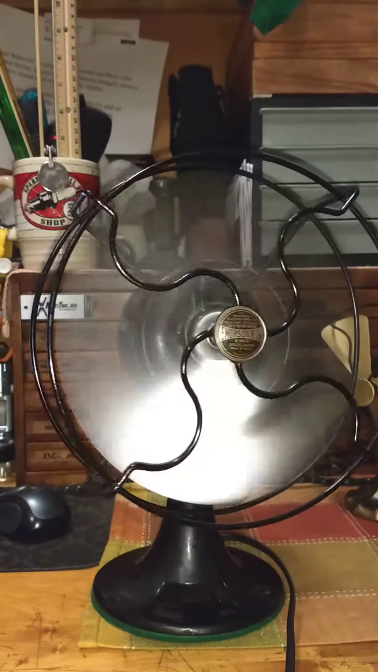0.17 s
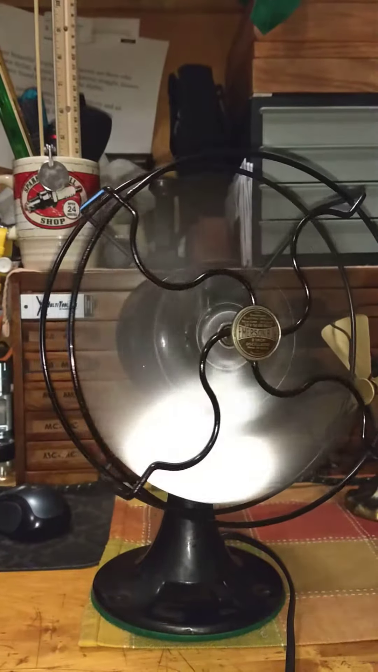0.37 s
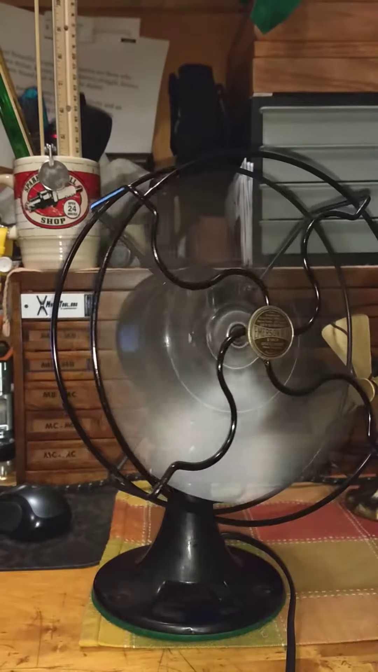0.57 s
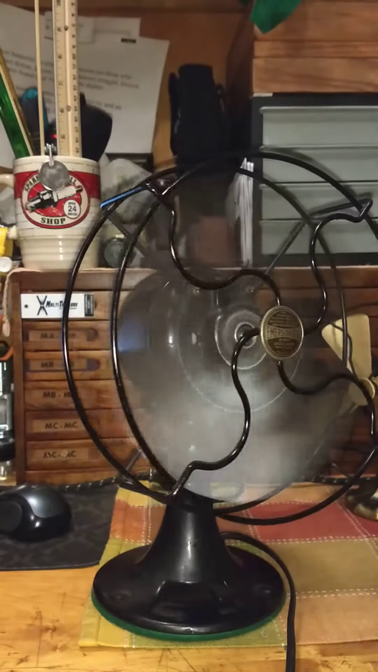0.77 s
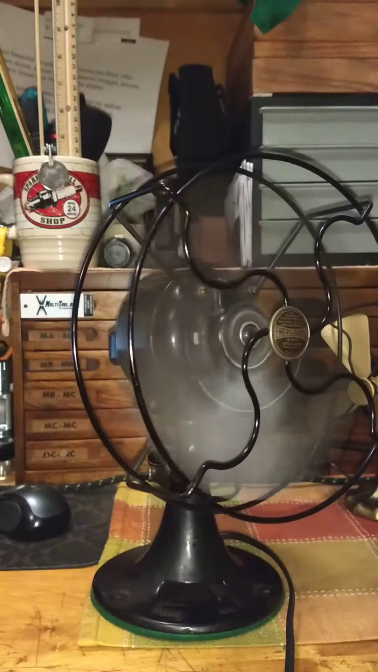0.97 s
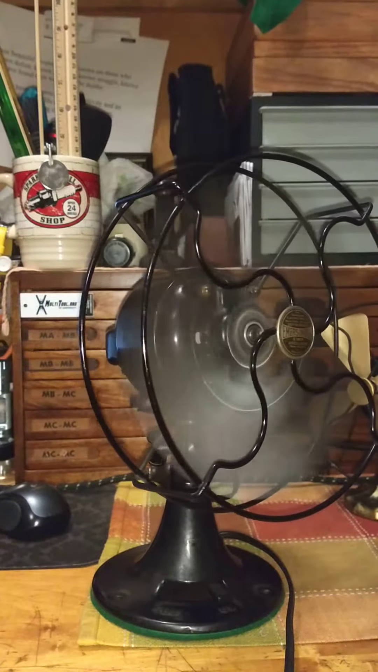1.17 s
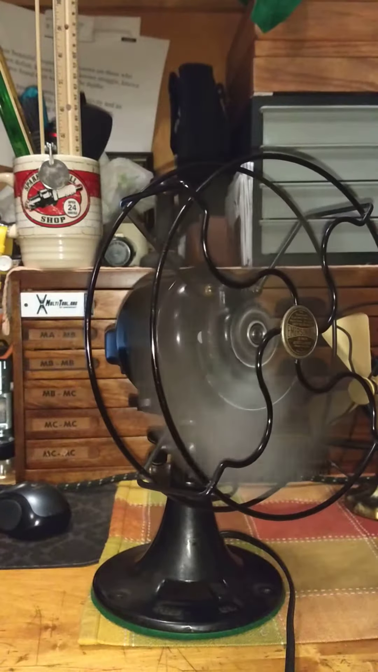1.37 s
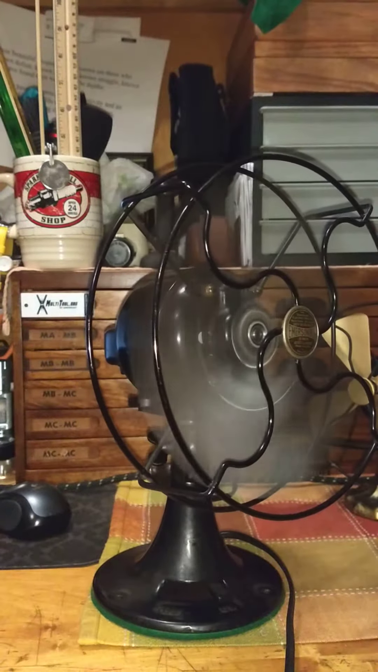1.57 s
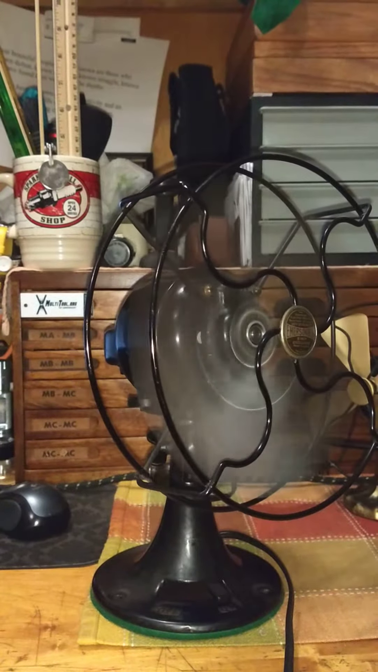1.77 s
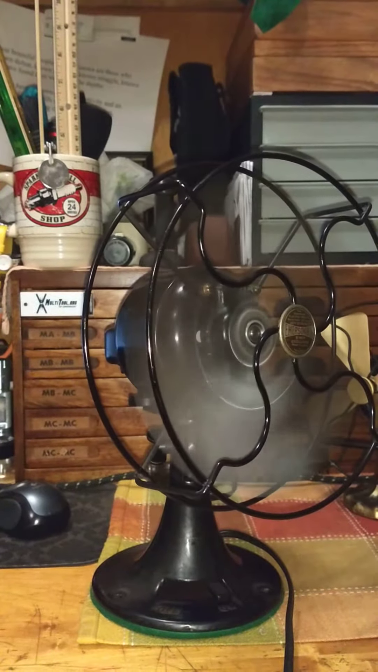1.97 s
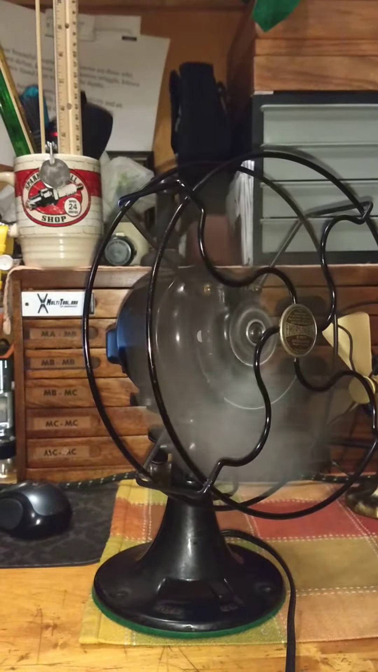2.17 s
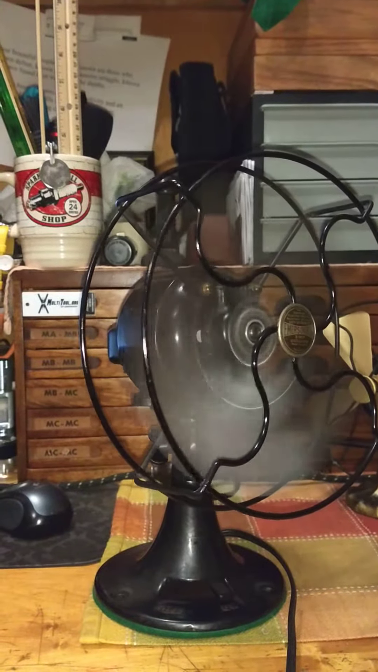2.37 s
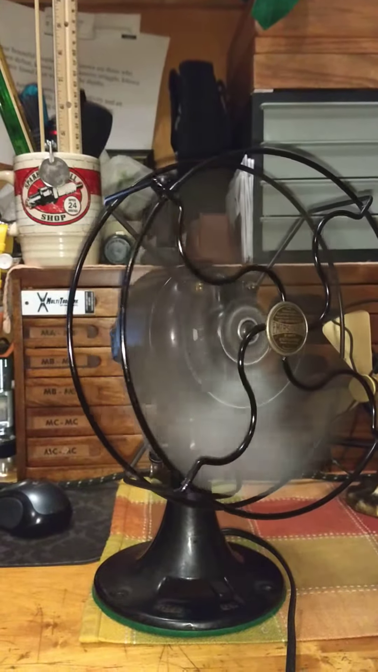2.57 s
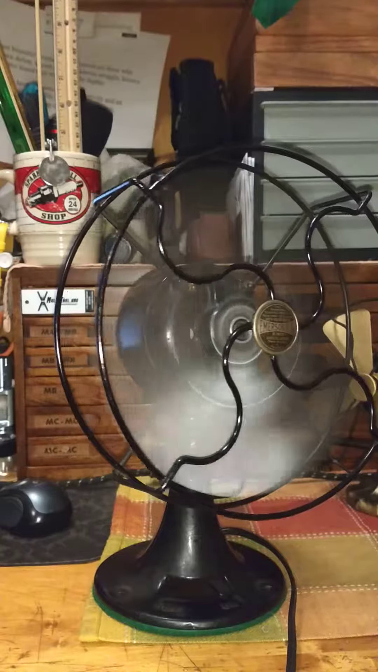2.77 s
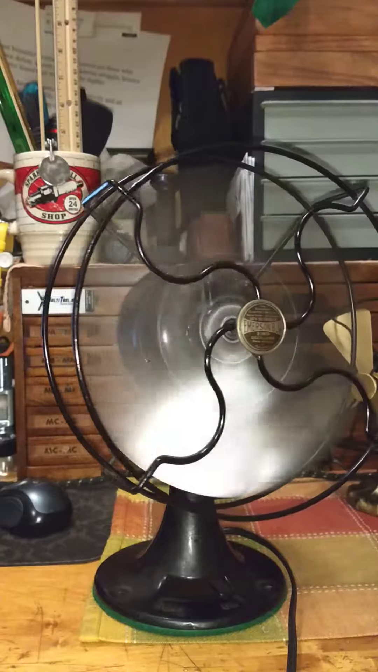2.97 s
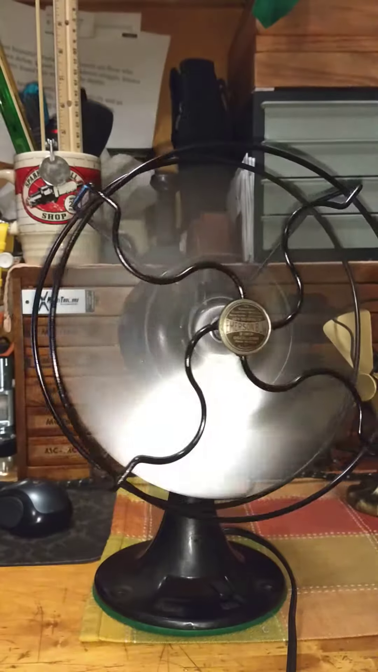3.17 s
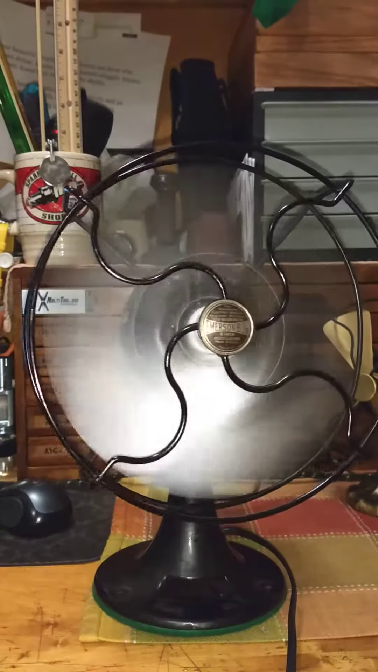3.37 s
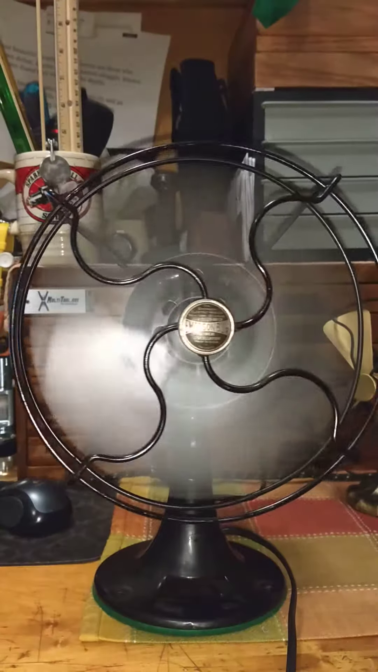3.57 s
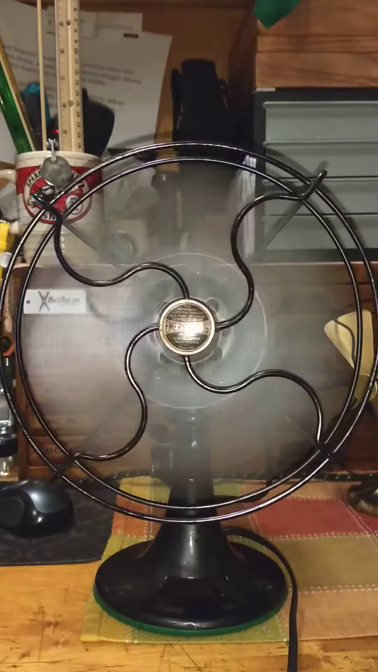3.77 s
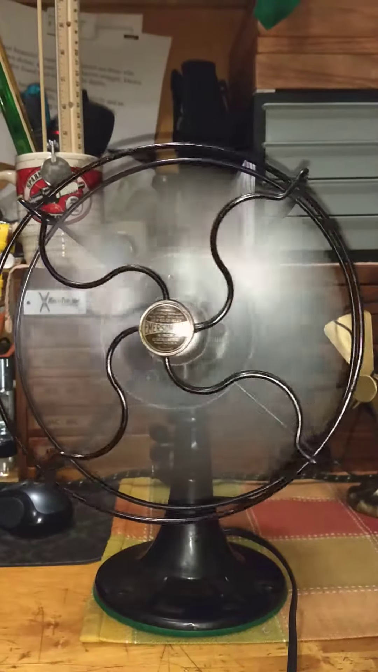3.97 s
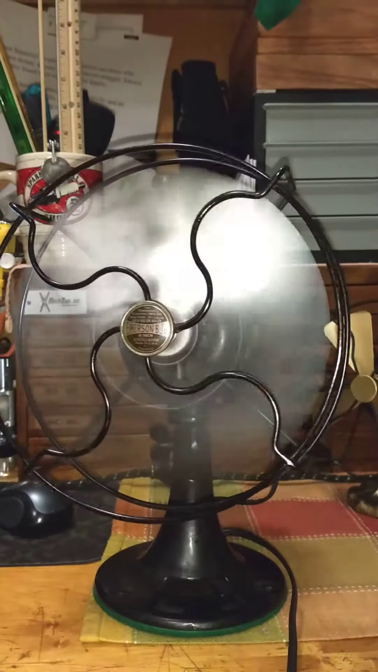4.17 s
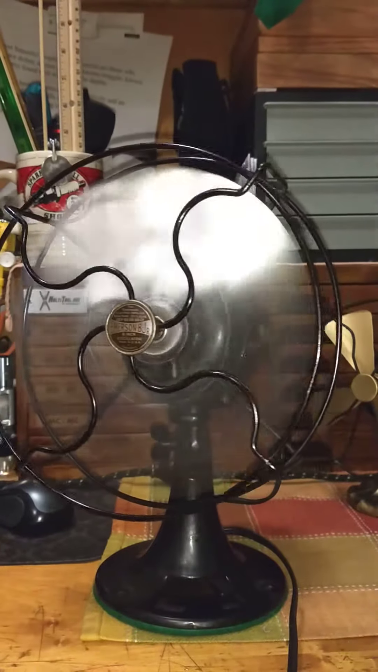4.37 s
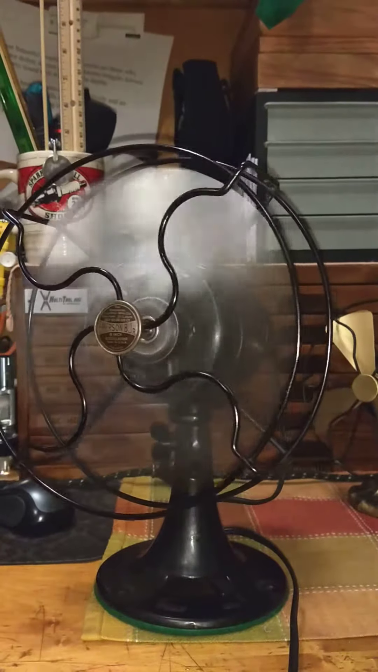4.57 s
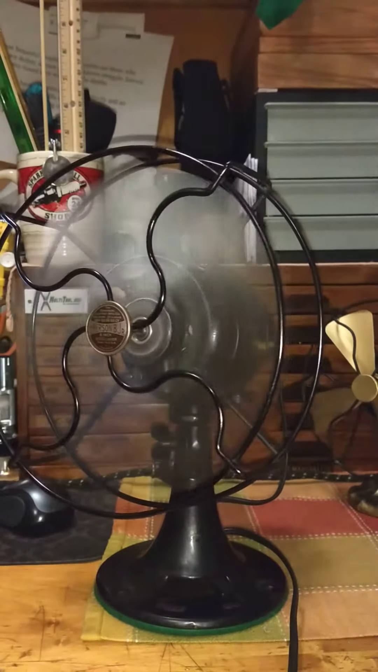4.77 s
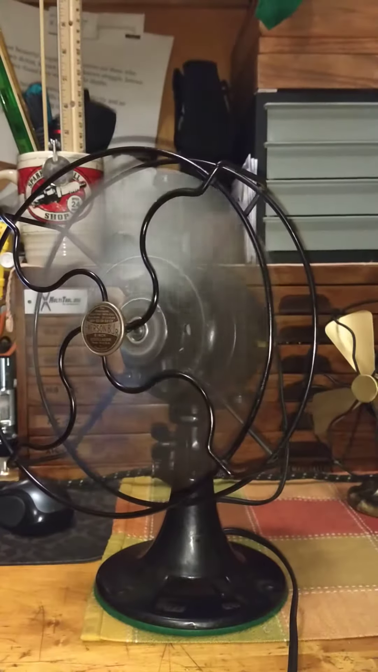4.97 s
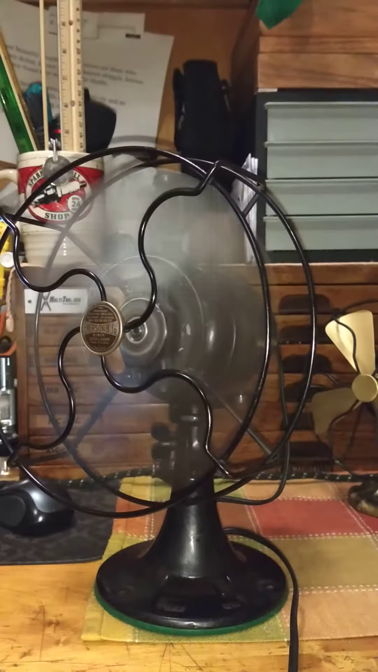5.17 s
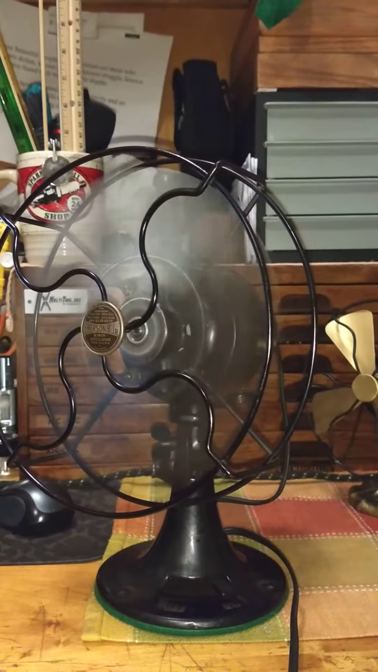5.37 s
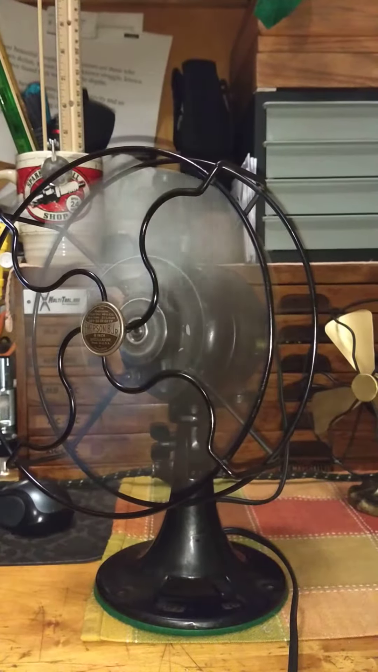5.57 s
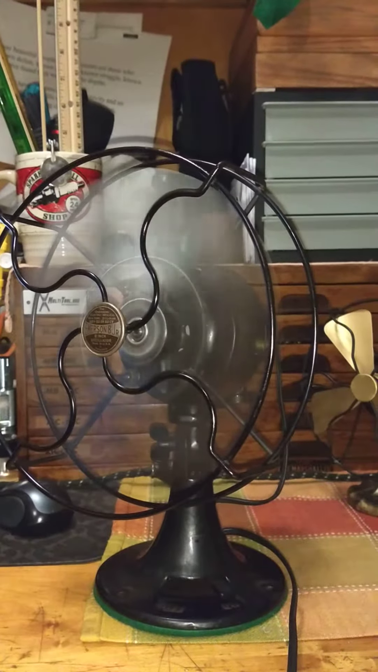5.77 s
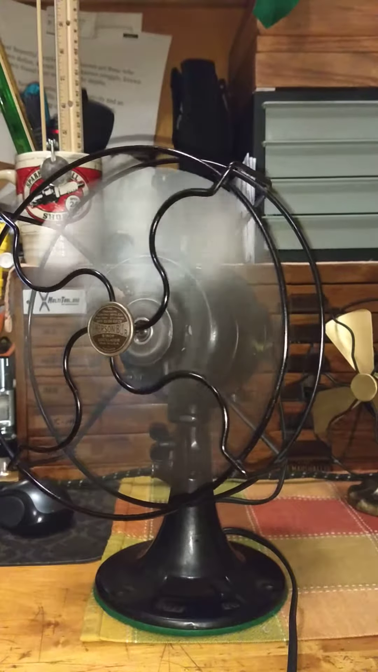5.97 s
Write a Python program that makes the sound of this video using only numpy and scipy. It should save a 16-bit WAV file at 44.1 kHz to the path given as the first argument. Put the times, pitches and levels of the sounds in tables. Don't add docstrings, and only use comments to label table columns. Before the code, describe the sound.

An old electric desk fan sweeps from side to side, very close to a stereo microphone in a small indoor space. From 0 to about 0.7 seconds its departing airstream buffets the microphone with deep thumps, crackles and a few sharp slaps, while the fan itself sounds pushed down. The gusts vanish and, from about 0.8 to 3.2 seconds, the fan is heard alone: a steady low mains hum, a gently wavering blade drone, faint metallic resonance and a soft, even rush of air, slowly rising in level. Around 3.3 seconds rumbling gusts return, growing rougher and crackling, with the hardest slap at 4.0 and more sharp knocks until about 4.4. The two sides are struck differently. Scattered weaker puffs follow until 5.0, and the ducked hum and rush gradually climb back, continuing smoothly to the end at 6 seconds.

```python
import sys
import numpy as np
from scipy import signal
from scipy.fft import rfft, irfft
from scipy.io import wavfile
from scipy.ndimage import uniform_filter1d, minimum_filter1d

SR = 44100
rng = np.random.default_rng(int(sys.argv[2]) if len(sys.argv) > 2 else 0)


def undo_db(level):
    steps = np.asarray(level, float) / 20
    return 10 ** steps


def master(y):
    cut = np.clip(np.atleast_2d(y).T, -1, 1)
    pcm = np.round(cut * 32767)
    wavfile.write(sys.argv[1], SR, pcm.astype(np.int16))


N = 264908


def rms_one(x):
    return x / np.sqrt(np.mean(x ** 2) + 1e-20)


def in_time(rows):
    s, *columns = np.transpose(rows)
    return [np.interp(np.arange(N) / SR, s, column) for column in columns]


def drift(rate):
    r = np.exp(-80 * np.pi * rate / SR)
    chance = rng.standard_normal(N // 40 + 2002)
    slow = rms_one(signal.lfilter([1], [1, -2 * r, r * r], chance)[2000:])
    return np.interp(np.arange(N) / 40, np.arange(len(slow)), slow)


def coloured(spectrum, patchy_db):
    hz = np.fft.rfftfreq(N, 1 / SR) + 1
    knots, level_db = np.transpose(spectrum)
    shape = undo_db(np.interp(np.log(hz), np.log(knots), level_db, left=-150, right=level_db[-1]))
    noise = rfft(rng.standard_normal(N)) * shape * np.sqrt(SR / 2)
    together = drift(13.0)
    out = 0
    for octave in np.arange(4, 15):
        band = np.clip(1 - abs(np.log2(hz) - octave), 0, 1)
        flicker_db = patchy_db * (together + 1.3 * drift(36))
        out = out + irfft(noise * band, N) * undo_db(flicker_db)
    return out


def evened(x, span_s):
    size = max(int(span_s * SR), 2)
    power = uniform_filter1d(uniform_filter1d(x ** 2, size=size), size=size)
    return x / np.sqrt(2 * power + 1e-20)


def partials(f0_hz, orders, wobble_db, wander):
    turns = f0_hz * np.arange(N) / SR + wander * drift(0.81)
    tones = []
    for k, db in orders:
        level = np.sqrt(2) * undo_db(db + wobble_db * drift(21))
        tones.append(level * np.sin(2 * np.pi * (round(k) * turns + rng.random())))
    return tones


def hiss():
    return undo_db(-76.5) * rng.standard_normal((2, N))


# [t/s, depth/dB]
KNOCKS = [(0.0, 12), (0.13, 12.5), (0.24, 12.5), (3.465, 6.5), (3.553, 11), (3.65, 12.5), (3.77, 11.5),
          (4.005, 12), (4.03, 16.5), (4.14, 15), (4.285, 14.5), (4.385, 14.5)]


def ducking():
    recovery_db_per_s, grip_s = 10.5, 0.011
    t = np.arange(N) / SR
    dips = [np.where(t >= s, db - recovery_db_per_s * (t - s), 0) for s, db in KNOCKS]
    depth_db = np.max(dips + [0 * t], axis=0)
    return -uniform_filter1d(depth_db, size=max(int(grip_s * SR), 1))


# [f/Hz, width/Hz, level/dB over the rush]
CAGE = [(276, 8, -5), (402, 10, -8), (770, 14, -8), (897, 24, -5), (1071, 16, -5), (7785, 40, -33)]


def cage():
    out = 0
    for hz, width, db in CAGE:
        r = np.exp(-np.pi * width / SR)
        w = 2 * np.pi * hz / SR
        ring = signal.lfilter([1, 0, -1], [1, -2 * r * np.cos(w), r * r], rng.standard_normal(N))
        out = out + undo_db(db) * rms_one(ring)
    return out


# [multiple of 120 Hz, level/dB over the rush]
HUM = [(1, 16), (2, -1), (3, -9), (5, 0), (6, -13.5)]
# [t/s, hum level/dB, extra fifth partial level/dB]
HEADING = [
    (0, -8, -14),
    (.8, 1.5, -7),
    (1.5, -1, -4.5),
    (2.0, 2.5, -0.5),
    (2.7, 0.5, -4.5),
    (3.2, 1.5, -3.5),
    (4.7, 2.5, -15),
    (5.4, 4.5, -2),
    (6.01, 3.5, -13),
]


def mains_hum():
    hum_db, fifth_db = in_time(HEADING)
    hum = partials(120.0, HUM, wobble_db=0.7, wander=0.012)
    hum[3] = hum[3] * undo_db(fifth_db)
    return undo_db(hum_db) * sum(hum)


# [multiple of 110.2 Hz, level/dB over the rush]
BLADES = [(2, 3), (3, -0.5), (4, -11.5)]


def blade_tones():
    return sum(partials(110.2, BLADES, wobble_db=3.0, wander=0.12))


# [f/Hz, level/dB per Hz]
RUSH_SUM = [(30, -93), (60, -77.5), (90, -68.9), (160, -64.5), (280, -76), (520, -79), (800, -78.5),
            (1400, -79.5), (1700, -81.5), (2700, -82.5), (3800, -92), (6000, -97.5), (8300, -107.8),
            (12700, -108.7), (15000, -110.9)]
# [f/Hz, level/dB per Hz]
RUSH_DIFFERENCE = [(30, -104.0), (60, -107), (90, -82), (160, -85), (280, -80.5), (520, -84), (800, -81.5),
                   (1400, -77.5), (1700, -82.5), (2700, -84.5), (3800, -89), (6000, -99.2), (8300, -108.3),
                   (12700, -109.0), (15000, -109.3)]


def fan():
    rush_db = -52.5 + ducking()
    lean_db = np.array([[-.5], [.5]])
    tones = mains_hum() + blade_tones() + cage()
    both = undo_db(52.5) * coloured(RUSH_SUM, patchy_db=0.19) + tones
    apart = undo_db(53.5) * coloured(RUSH_DIFFERENCE, patchy_db=0.0) + undo_db(-34.5) * np.roll(tones, 60)
    return undo_db(rush_db) * np.array([both + apart, both - apart]) * undo_db(lean_db)


# [t/s, peak level/dB]
SNAPS = [(0.014, -14.5), (0.058, -18.5), (0.087, -24), (0.121, -29), (0.142, -22), (0.275, -28),
         (0.309, -24), (0.421, -28), (3.482, -25), (3.548, -26), (3.573, -19.5), (3.658, -20.5),
         (3.743, -23), (3.767, -17.5), (3.833, -13), (3.899, -16), (4.002, -4), (4.072, -16), (4.092, -19),
         (4.12, -17.5), (4.164, -16), (4.207, -15), (4.238, -25), (4.285, -15.5), (4.326, -8), (4.334, -15),
         (4.385, -13.5), (4.489, -23.5), (4.908, -26.5)]


def snaps():
    out = np.zeros(N + 2000)
    t = np.arange(1500) / SR
    shape = (t / 0.0024) ** 2 * np.exp(2 - 2 * t / 0.0016)
    tick_shape = np.exp(-((t - .0025) / 0.00088) ** 2)
    for (s, db), (phase, chance) in zip(SNAPS, rng.random((len(SNAPS), 2))):
        hz = 553 * (1 + .1 * (2 * chance - 1))
        slap = shape * np.sin(2 * np.pi * (hz * t * (1.2 - 25 * t) + phase))
        tick = tick_shape * np.sin(2 * np.pi * (2.05 * hz * t + phase))
        out[int(s * SR) - 60:][:len(t)] += undo_db(db + 1) * (slap + undo_db(-18.5) * tick)
    return out[:N]


# [f/Hz, level/dB per Hz]
DEEP = [(20, -40.5), (40, -23), (80, -2.5), (120, -1.5), (170, -4), (250, -26), (400, -51), (1000, -130)]
# [f/Hz, level/dB per Hz]
THUMP = [(70, -26), (130, -14.5), (200, 4), (300, -4.5), (400, -14), (550, -27), (750, -43), (1500, -120)]
# [f/Hz, level/dB per Hz]
CRACKLE = [(250, -22), (400, 2.5), (550, -6.5), (800, -15.5), (1300, -34), (2000, -63.5), (3000, -105),
           (4000, -140)]


def buffeting(eddies, stream_db):
    t = np.arange(N) / SR
    brighter = np.clip(0.23 * (stream_db + 21.5), -12, 3)
    low = undo_db(stream_db - 4)
    middle = undo_db(stream_db - 7.5 + brighter)
    high = undo_db(stream_db - 21.5 + brighter)
    for s, width, rumble_db, bite_db in eddies:
        thump_db = rumble_db + bite_db
        crackle_db = rumble_db + 1.47 * bite_db - 17.5
        near = slice(max(int((s - .1) * SR), 0), int((s + .1) * SR))
        late = (t[near] - s) / width
        bell = np.exp(-(late / np.where(late < 0, .44, .8)) ** 2)
        low[near] += undo_db(rumble_db + 1.0) * bell ** 0.47
        middle[near] += undo_db(thump_db) * bell ** 0.96
        high[near] += undo_db(crackle_db + 1.0) * bell ** 1.95
    deep = evened(coloured(DEEP, patchy_db=-1.0), 0.012)
    thump = evened(coloured(THUMP, patchy_db=6.0), 0.0064)
    crackle = evened(coloured(CRACKLE, patchy_db=-2.5), 0.019)
    return low * deep + middle * thump + high * crackle


# [t/s, first port level/dB, second port level/dB]
STREAM = [
    [(0, -16, -19), (.1, -24, -22.5), (.3, -27, -22), (.45, -44, -52), (.75, -48, -56), (.95, -57.5, -65)],
    [(3.25, -60, -45), (3.45, -27, -17.5), (3.6, -36, -17), (3.9, -29, -24), (4.1, -17.5, -39),
     (4.38, -14.5, -31), (4.45, -42, -55), (4.6, -39, -49), (5.1, -69, -46)],
]
# [t/s, width/s, strength level/dB, bite/dB]
LEAVING = [(0.034, 0.0056, -14, -17), (0.065, 0.0092, -17.5, 11), (0.11, 0.032, -16, -2),
           (0.143, 0.012, -14, -8), (0.161, 0.011, -11, 2), (0.184, 0.011, -14.5, -12),
           (0.211, 0.023, -14.5, -4.5), (0.247, 0.012, -16, 4.5), (0.277, 0.0085, -7.5, -1),
           (0.315, 0.01, -11, 4.5), (0.365, 0.013, -17, 3.5), (0.428, 0.015, -9, -12),
           (0.483, 0.0096, -17, -20), (0.534, 0.014, -24, -34), (0.568, 0.014, -24, -12),
           (0.616, .01, -26, -24), (0.646, .014, -22.5, -12)]
# [t/s, width/s, strength level/dB, bite/dB]
CROSSING = [(3.308, 0.009, -10, -17), (3.345, 0.0092, -17.5, -16), (3.391, 0.028, -17, -11),
            (3.425, 0.017, -12.5, -7), (3.461, 0.021, -7, -12), (3.499, 0.017, -6.5, -13),
            (3.549, 0.015, -5, -10), (3.58, 0.014, -5, -2.5), (3.62, .006, -14, -16),
            (3.702, 0.015, -17, -10), (3.73, 0.01, -16, -25), (3.757, 0.021, -21.5, 4),
            (3.807, 0.021, -13.5, -20), (3.891, 0.016, -29, 14.5), (3.915, 0.04, -19, 7.5),
            (3.978, 0.039, -11, 4), (4.036, 0.0049, -11, 3), (4.128, 0.025, -34, 8),
            (4.17, 0.0086, -16, -3), (4.219, 0.013, -18.5, 1), (4.248, 0.011, -31, 16),
            (4.292, 0.013, -34, 21), (4.338, 0.02, -21.5, 13), (4.387, 0.012, -23, 10)]
# [t/s, width/s, strength level/dB, bite/dB]
STRAGGLERS = [
    (4.426, 0.014, -33, -6),
    (4.493, 0.01, -17.5, 4.5),
    (4.512, 0.017, -18, -1),
    (4.554, 0.011, -19.5, -9),
    (4.698, .018, -26.5, -16),
    (4.886, 0.016, -32.5, 3.5),
    (4.922, .025, -22, -3.5),
    (4.965, 0.012, -32, 6.5),
    (4.99, .022, -33, -17),
]
# [t/s, width/s, strength level/dB, bite/dB]
SECOND_PORT = [(0.017, 0.016, -17.5, -1.5), (0.072, 0.032, -20, -2), (0.104, 0.012, -19, -10),
               (0.127, .007, -27, 7), (0.144, 0.0077, -26, 12), (0.188, 0.0066, -26, 3),
               (0.333, 0.024, -18.5, -13), (0.389, .013, -11.5, -8.5), (0.449, 0.02, -19.5, -7.5),
               (0.711, 0.0055, -20, -21), (3.511, 0.012, -32.5, 15.5), (3.527, .008, -15, -27),
               (3.635, 0.0081, -14, -1), (3.66, 0.015, -11.5, -4), (3.701, 0.011, -20, -8),
               (3.744, 0.029, -13.5, -9), (3.781, 0.0072, -15.5, 8), (3.841, 0.028, -14, 1.5),
               (3.921, 0.024, -16, 3), (4.004, 0.005, -19, 15), (4.026, 0.016, -7, 3),
               (4.086, 0.022, -13, 1.5), (4.127, 0.035, -28.5, 15), (4.192, .006, -28, 6),
               (4.212, 0.03, -19, 8), (4.245, 0.013, -17, -4)]


def wind():
    first_db, second_db = in_time(STREAM[0] + STREAM[1])
    first = buffeting(LEAVING + CROSSING + STRAGGLERS, first_db) + snaps()
    second = buffeting(SECOND_PORT, second_db)
    return np.array([first, second])


def scene():
    return hiss() + fan() + wind()


def limiter(x):
    room = np.minimum(1, undo_db(-1.5) / (abs(x).max(axis=0) + 1e-9))
    held = minimum_filter1d(room, size=801)
    return x * uniform_filter1d(uniform_filter1d(held, size=400), size=400)


def top_cut(x):
    return signal.sosfilt(signal.butter(12, 16320, fs=SR, output="sos"), x)


def record(dry):
    delay = 20
    late = np.pad(dry[::-1], ((0, 0), (delay, 0)), mode="reflect", reflect_type="odd")[:, :N]
    trim_db = 0.38 * np.array([[.5], [-.5]])
    sides = (dry - .93 * late) * undo_db(trim_db)
    sides = sides * np.minimum(np.arange(N) / (.002 * SR), 1)
    band = signal.butter(2, [2100, 6200], "band", fs=SR, output="sos")
    mismatch = signal.sosfilt(band, sides[::-1])
    sides = sides + undo_db(-12) * mismatch * [[1], [-1]]
    treble_limit = signal.ellip(12, .5, 60, 15740, fs=SR, output="sos")
    sides = signal.sosfilt(treble_limit, limiter(sides))
    return top_cut(sides)


dry = scene()
out = record(dry)
master(out)
```